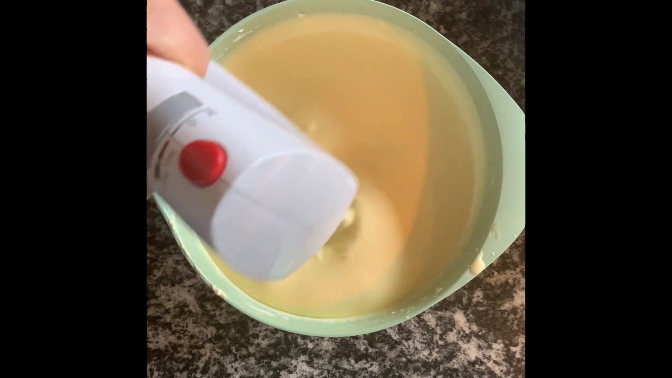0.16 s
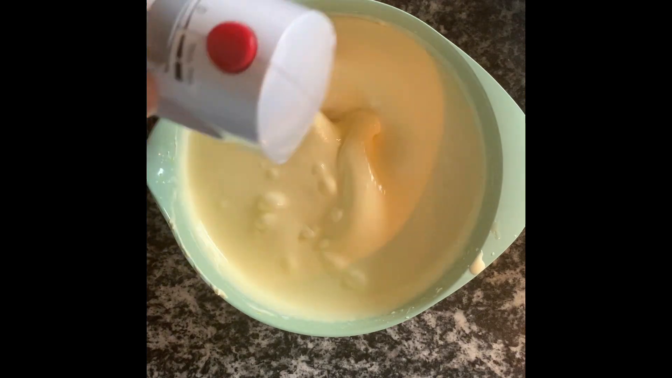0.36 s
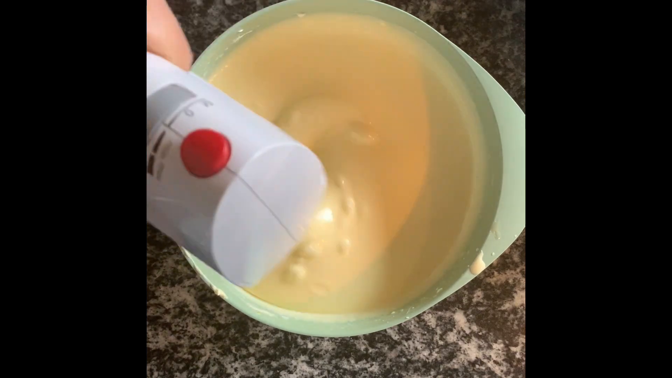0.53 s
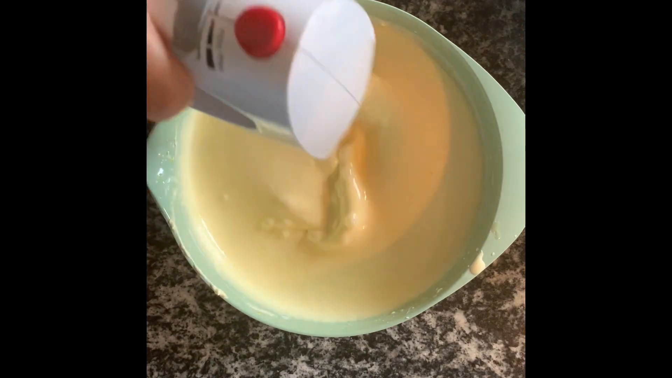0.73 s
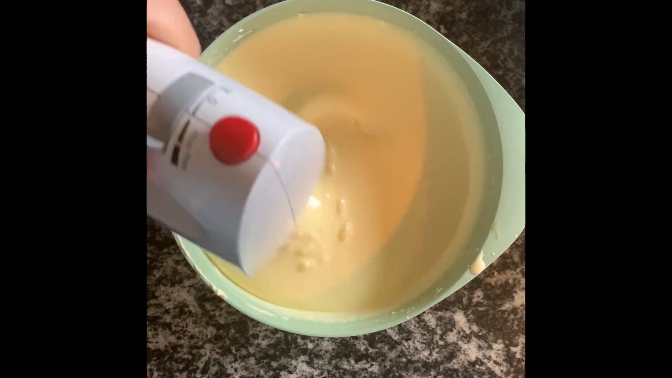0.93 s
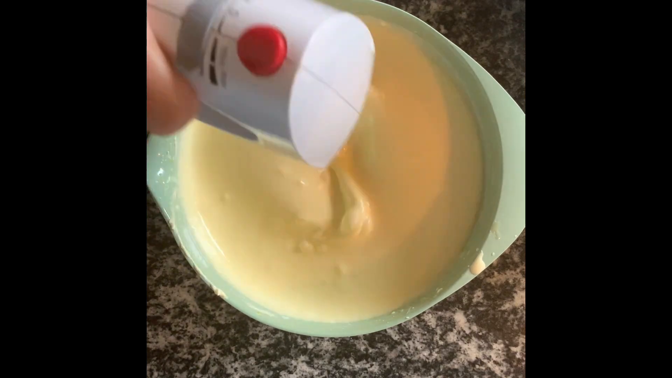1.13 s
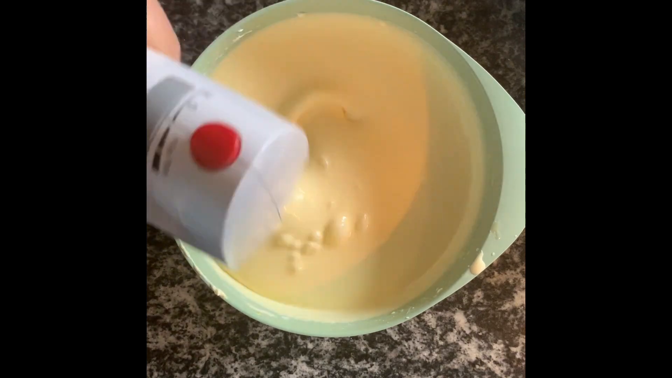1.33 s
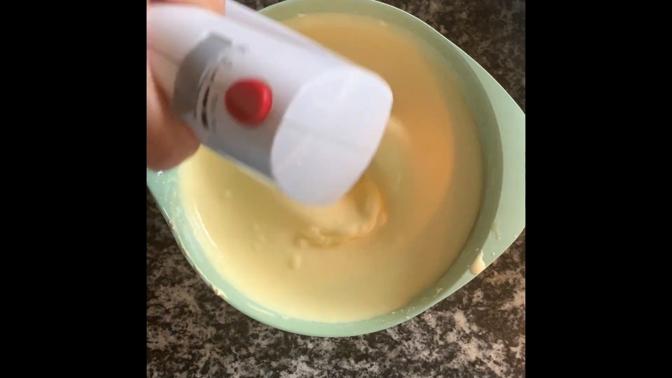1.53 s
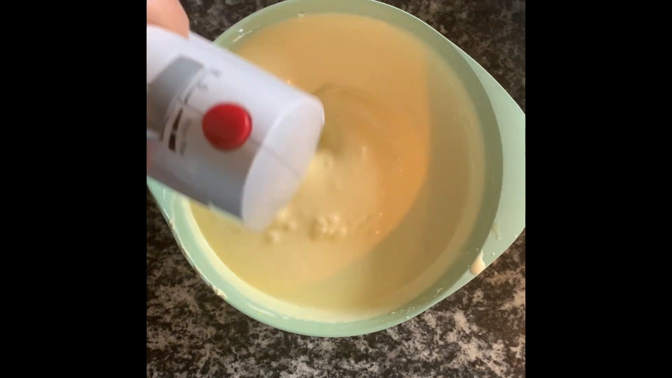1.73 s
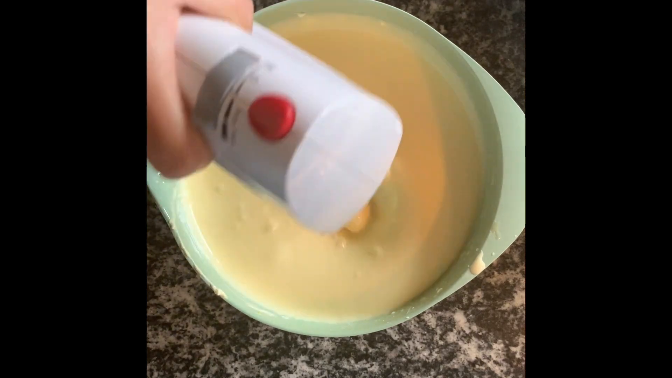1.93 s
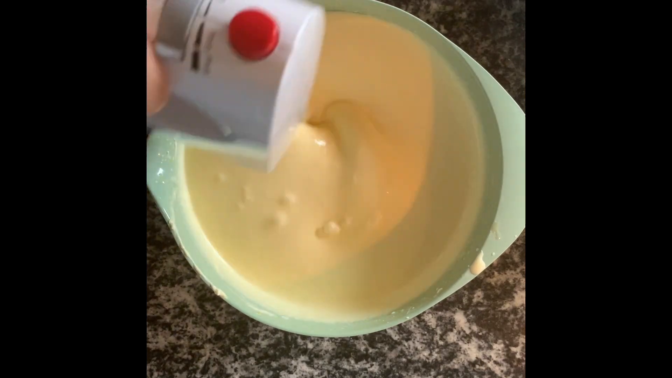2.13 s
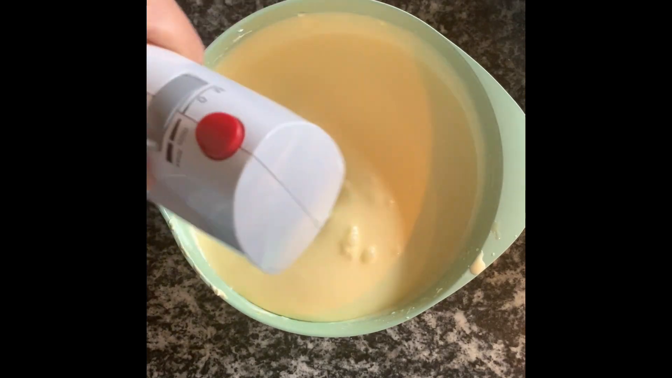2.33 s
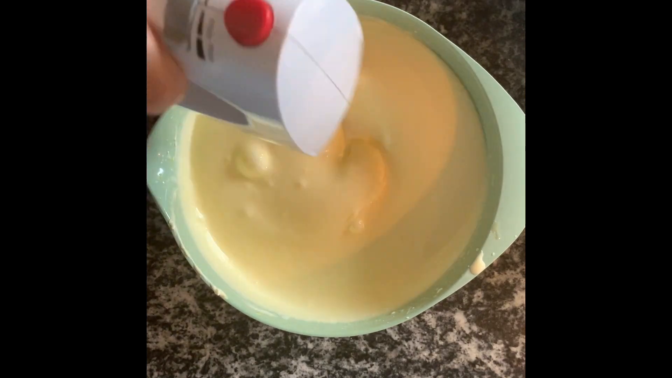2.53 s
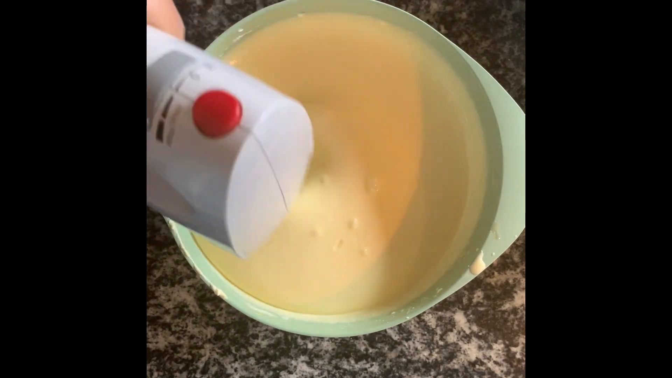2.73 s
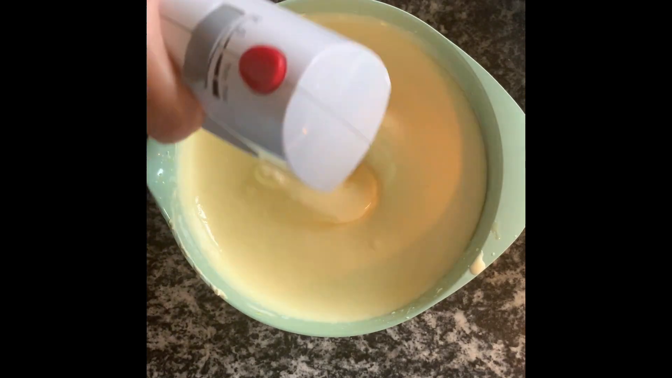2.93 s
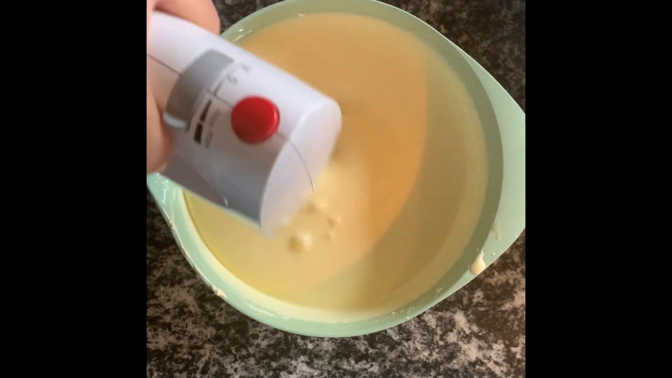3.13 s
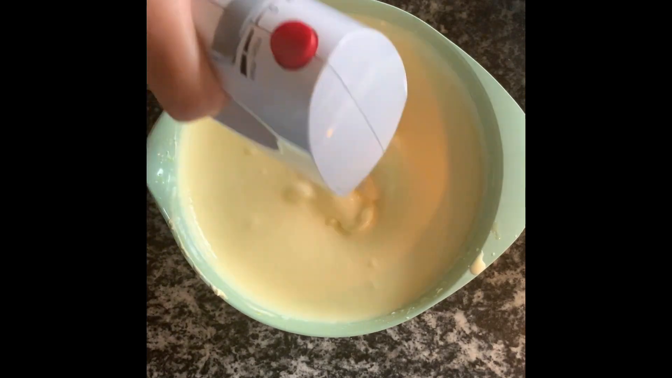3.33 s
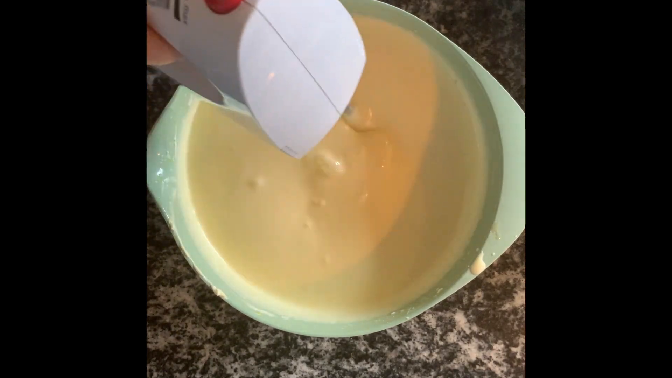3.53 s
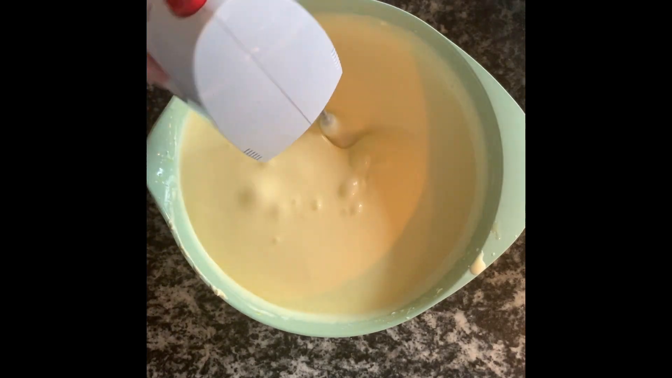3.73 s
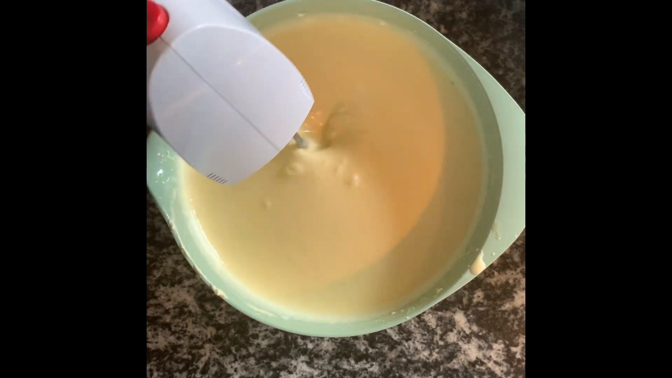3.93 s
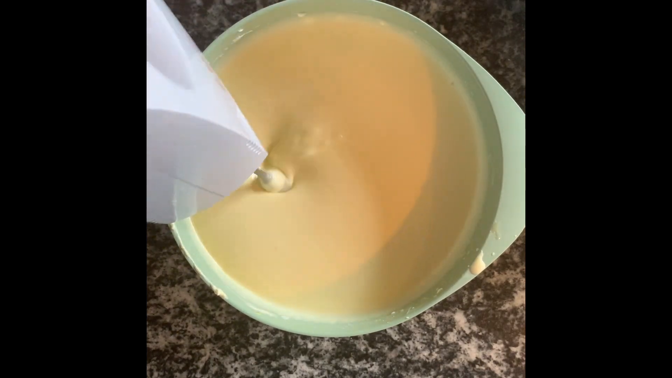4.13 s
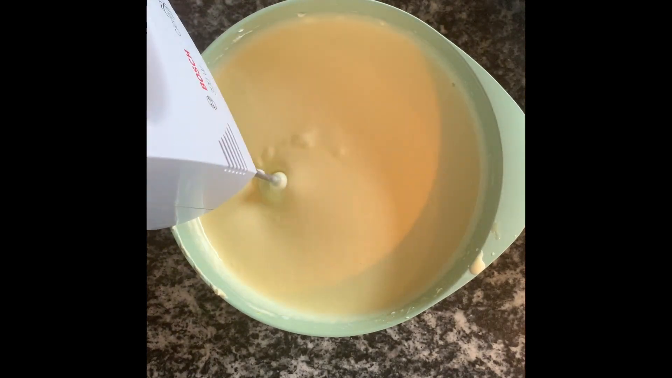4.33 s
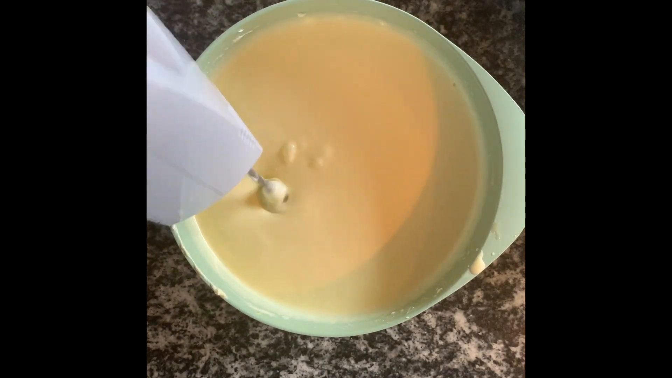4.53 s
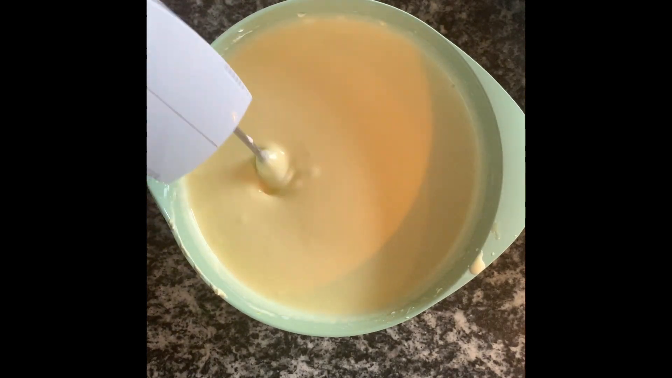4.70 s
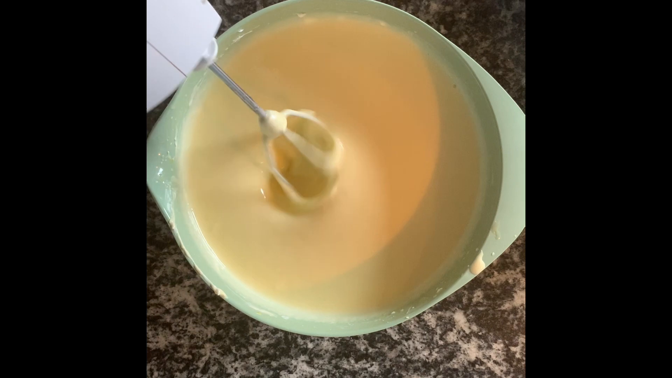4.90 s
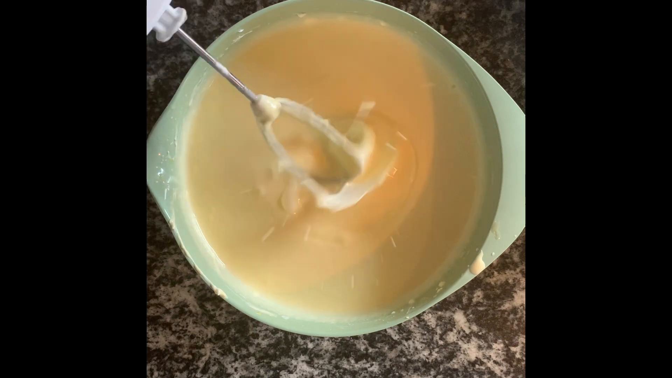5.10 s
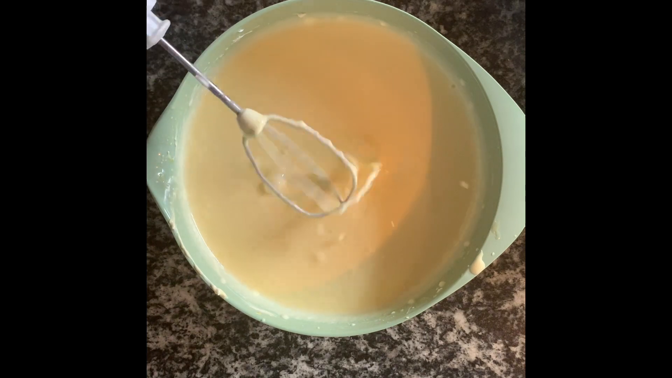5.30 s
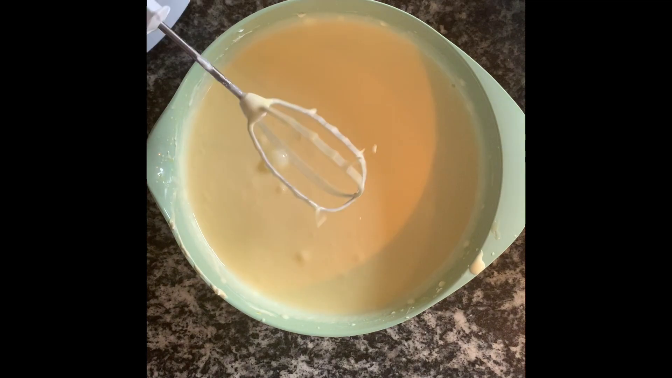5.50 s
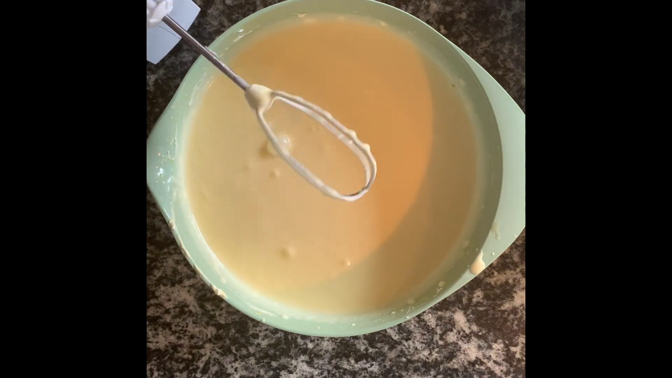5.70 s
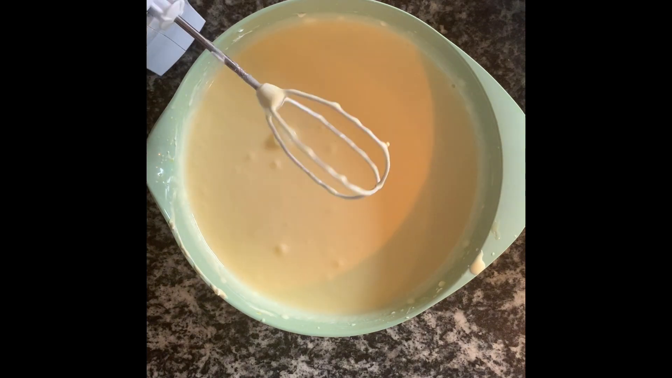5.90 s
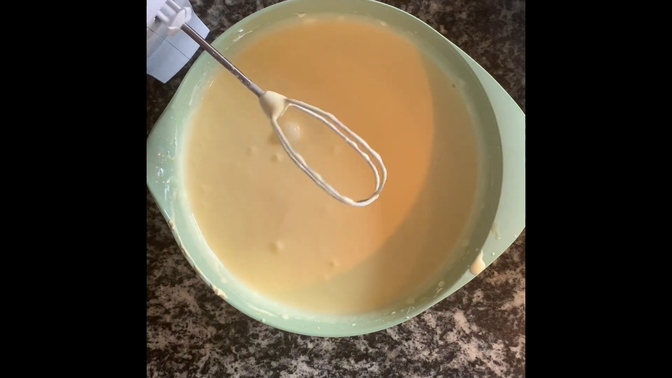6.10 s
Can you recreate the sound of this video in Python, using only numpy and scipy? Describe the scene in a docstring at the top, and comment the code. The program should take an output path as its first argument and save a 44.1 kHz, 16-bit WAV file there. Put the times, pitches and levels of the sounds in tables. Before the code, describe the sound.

Close up in a small hard-walled kitchen, an electric hand mixer hisses and whirrs steadily while its beater churns thick batter with a low burble. Wires rattle and knock in quick clusters against a plastic bowl. After about four seconds the power cuts, the whine slides down, wet slaps patter briefly, the loose shaft ticks slower and quieter, and a plastic clack ends it.

```python
"""An electric hand mixer whisks thick batter in a plastic bowl on a stone worktop.
At first the motor hisses and whines, the gears whirr, the beater churns, and its wires (bursts of noise
through the bowl's resonances) rattle and knock on each sweep along the wall. Then the power goes off,
the shaft runs down ticking, and the beater is lifted out still spinning, slapping the surface.
Last, the plastic housing clacks: noise bursts through its own resonances."""
import sys
import numpy as np
from scipy import signal
from scipy.fft import rfft, irfft, next_fast_len
from scipy.io import wavfile
from scipy.ndimage import uniform_filter1d

SR = 44100
rng = np.random.default_rng(int(sys.argv[2]) if len(sys.argv) > 2 else 0)


def generate_wav(sig):
    """Save sig (samples, or channels by samples) to the path in sys.argv[1] as 16-bit PCM at SR."""
    pcm = np.round(np.clip(np.atleast_2d(sig).T, -1, 1) * 32767).astype(np.int16)
    wavfile.write(sys.argv[1], SR, pcm)


N = 271213
T = np.arange(N) / SR
SIZE = next_fast_len(N + SR // 2)
HZ = np.maximum(np.arange(SIZE // 2 + 1) * SR / SIZE, 1)
CUTOFF_HZ = 16200


def from_db(db):
    """Decibels to gain."""
    return 10 ** (np.asarray(db) / 20)


def rms_one(x):
    """Scale to unit rms."""
    return x / np.sqrt(np.mean(x ** 2) + 1e-20)


def levelled(x):
    """Unit rms over every stretch of 3000 samples."""
    return x / np.sqrt(np.abs(uniform_filter1d(x ** 2, size=3000)) + 1e-12)


def noise():
    """White noise, unit rms."""
    return rng.standard_normal(N)


def over_time(points):
    """A curve in time, joined by straight lines."""
    s, value = np.transpose(points)
    return np.interp(T, s, value)


def over_hz(points):
    """A spectrum, joined by straight lines on a log-frequency axis."""
    hz, value = np.transpose(points)
    return np.interp(np.log(HZ), np.log(hz), value)


def drift(rate):
    """Slow chance with spread 1; rate in knots per s."""
    knots = rng.standard_normal(4000)
    return np.interp(T * rate, np.arange(len(knots)), knots) * np.sqrt(3 / 2)


def body(x, colour, resonances=()):
    """Minimum-phase filter of unit power gain: a broad colour with resonant peaks on it."""
    gain = from_db(over_hz(colour))
    for hz, width_hz, boost_db in resonances:
        peak = 1 / (1 + (2 * (HZ - hz) / width_hz) ** 2)
        gain = gain * np.sqrt(1 + (from_db(boost_db) ** 2 - 1) * peak)
    # folding the cepstrum makes the filter causal
    cepstrum = irfft(np.log(rms_one(gain) + 1e-9), SIZE)
    cepstrum[1:SIZE // 2] *= 2
    cepstrum[SIZE // 2 + 1:] = 0
    return irfft(rfft(x, SIZE) * np.exp(rfft(cepstrum)), SIZE)[:N]


def moving_ring(x, centre_hz, width_hz):
    """A narrow resonance whose centre moves: shift to 0 Hz, low-pass, shift back; levelled."""
    spin = np.exp(2j * np.pi * np.cumsum(centre_hz) / SR)
    narrow = signal.butter(2, width_hz, fs=SR, output="sos")
    return levelled(np.real(spin * signal.sosfilt(narrow, x / spin)))


def clicks(times, gains):
    """One impulse for each contact."""
    out = np.zeros(N)
    index = np.clip(np.round(np.asarray(times) * SR).astype(int), 0, N - 1)
    np.add.at(out, index, gains)
    return out


def bursts(times, gains, decay_s):
    """Each contact is a dense flurry of tiny slips that dies away."""
    starts = clicks(times, np.asarray(gains) ** 2) + 1e-18
    power = signal.lfilter([1], [1, -np.exp(-2 / (decay_s * SR))], starts)
    return np.sqrt(power) * noise()


# room re direct sound [f/Hz, level/dB]
KITCHEN_WET = [(150, -18), (500, -10), (2300, -8), (4500, -12), (16000, -12)]


def kitchen(x, t60_s=.16):
    """A short diffuse tail from hard walls, unrelated at the two ports."""
    t = T[:SR // 2]
    tail = rng.standard_normal((2, len(t))) * from_db(-60 * t / t60_s) * (t > .004)
    tail /= np.sqrt(np.sum(tail ** 2, axis=1, keepdims=True))
    return irfft(rfft(x, SIZE) * rfft(tail, SIZE) * from_db(over_hz(KITCHEN_WET)), SIZE)[:, :N]


# two microphone ports: left lead [f/Hz, phase/rad]
PORT_PHASE = [(0, 0), (200, -.1), (400, -.9), (700, -1.05), (830, .2), (980, -.6), (1150, .4), (1400, -.1),
              (2000, .5), (2350, 1.7), (3300, 1.3), (4000, 2.0), (4600, 3.1), (5100, 3.4), (6700, 6.28),
              (8950, 9.42), (11000, 12.57), (13200, 15.7), (15300, 18.85), (17000, 20)]
# left minus right [f/Hz, level/dB]
PORT_BALANCE = [(300, 0), (560, -3), (730, -10), (900, -1), (1080, -6), (1270, -1), (1600, -4),
                (1850, -1.5), (2270, -7), (2600, -2.5), (3300, 0)]


def ports(x):
    """The near sound reaches the two ports with a lag and a level that depend on frequency."""
    phase = np.interp(HZ, *np.transpose(PORT_PHASE))
    side = np.array([[.5], [-.5]])
    response = from_db(side * over_hz(PORT_BALANCE)) * np.exp(1j * side * phase)
    return irfft(rfft(x, SIZE) * response, SIZE)[:, :N]


# low thuds and lumps, also for the bowl [f/Hz, level/dB]
CHURN_COLOUR = [(25, -84), (50, -15.5), (75, 1.5), (120, -1), (165, 2), (260, -3.5), (500, -13),
                (2000, -74.5)]
# housing resonances [f/Hz, width/Hz, boost/dB]
HOUSING_MODES = [(148, 22, 26), (521, 42, 17), (656, 27, 18.4), (949, 50, 13.7), (1535, 150, 10.4),
                 (2120, 80, 6), (2680, 200, 5)]
# light dry ticks [t/s, level/dB]
TICKS = [(4.965, -22), (6.052, -43)]
# spectra [f/Hz, level/dB]
TICK_COLOUR = [(800, -20), (2500, 0), (4500, 0), (8500, 0), (12000, -5), (16000, -9)]
CLACK_COLOUR = [(40, -23), (120, -21), (300, -45), (620, -3), (1600, 6), (2600, 8.5), (4300, -7),
                (7500, 5.5), (16000, -18)]
SHUDDER_COLOUR = [(40, -8), (150, -10), (400, -4), (650, -4), (1000, -2), (2200, -13), (4300, -14),
                  (7500, -18), (16000, -37)]
# housing jolted in the hand [t/s, sharp clack level/dB, dull thump level/dB]
JOLTS = [(5.6, -66, -56), (6.089, -25.5, -27), (6.136, -46, -30)]


def handling(clack_s=.0085, thump_s=.012, shudder_db=-16, shudder_s=.3):
    """Ticks and jolts of the plastic housing; after a clack it shudders on."""
    tick_s, tick_db = np.transpose(TICKS)
    s, clack_db, thump_db = np.transpose(JOLTS)
    ticks = body(bursts(tick_s, from_db(tick_db), decay_s=.0009), TICK_COLOUR)
    clack = body(bursts(s, from_db(clack_db), clack_s), CLACK_COLOUR, HOUSING_MODES)
    shudder = body(bursts(s, from_db(clack_db + shudder_db), shudder_s), SHUDDER_COLOUR, HOUSING_MODES)
    thump = body(bursts(s + .0038, from_db(thump_db), thump_s), CHURN_COLOUR, HOUSING_MODES)
    return ticks + clack + shudder + thump


# ticking of the coasting shaft [t/s, level/dB]
COAST = [(4.0, -80), (4.6, -41), (5.0, -41), (5.45, -59), (5.75, -62), (6.08, -47)]
# its spectrum [f/Hz, level/dB]
COAST_COLOUR = [(150, -48), (450, -26), (1000, 14), (2200, 12), (4300, -14), (7000, -12), (16000, -14)]
# singing of the housing [t/s, level/dB]
SING = [(4.0, -72), (4.7, -55), (5.2, -56), (5.55, -54.5), (5.9, -60), (6.1, -65)]


def coasting(turns, scatter_db=3.0, level_db=-1):
    """With the load gone the loose shaft ticks once a turn and keeps the housing's middle modes singing."""
    s = T[np.flatnonzero(np.diff(np.floor(turns)))]
    ticks = bursts(s, from_db(scatter_db * rng.standard_normal(len(s))), decay_s=.0042)
    ticking = from_db(over_time(COAST) + level_db) * body(ticks, COAST_COLOUR, HOUSING_MODES)
    sing = np.zeros(N)
    for hz, width_hz, boost_db in HOUSING_MODES:
        if 400 < hz < 1100:
            mode = moving_ring(noise(), hz + 18 * drift(rate=12), width_hz / 2)
            sing += from_db(boost_db / 2 + 4 * drift(rate=14)) * mode
    return ticking + from_db(over_time(SING)) * rms_one(sing)


# shaft speed [t/s, speed/(turns per s)]
SPEED = [(0, 228), (.25, 227.3), (1.0, 228.2), (1.6, 228.0), (2.2, 227.2), (2.45, 223.5), (2.8, 228.2),
         (3.4, 227.8), (3.97, 229), (4.15, 220), (4.3, 198.5), (4.45, 172), (4.6, 146.5), (4.8, 120.5),
         (5.0, 98.5), (5.2, 80.8), (5.5, 56), (6.15, 15)]


def shaft():
    """Speed in turns per s, and the turns it has added up to."""
    speed = over_time(SPEED)
    return speed, np.cumsum(speed) / SR


def tones(turns, speed, orders, blur_rad, flicker_db=2):
    """Multiples of a rotation rate below the cutoff, each wavering in level and phase."""
    out = np.zeros(N)
    for multiple, db in orders:
        phase = 2 * np.pi * multiple * turns + blur_rad * drift(rate=54)
        gain = from_db(db + flicker_db * drift(rate=28)) * (multiple * speed < CUTOFF_HZ)
        out += np.sqrt(2) * np.sin(phase) * gain
    return out


# brush and fan hiss [t/s, level/dB]
HISS = [(0, -43), (3.8, -43.5), (4.25, -42), (4.55, -45), (4.76, -54), (5.08, -55.5), (5.3, -49),
        (5.6, -52), (6.08, -64)]
# its spectrum [f/Hz, level/dB]
HISS_COLOUR = [(40, 1), (110, -24), (330, -33), (420, -6), (520, 1.5), (660, -7), (790, -7), (980, 11.5),
               (1200, -5.5), (2200, 6), (4300, -26.5), (5300, 1.5), (8800, 2), (11000, -3.5), (16000, -8.5)]
# vent resonances in the hiss [f/Hz, width/Hz, boost/dB]
VENTS = [(9300, 73, 4.5)]
# steady hum while powered [f/Hz, level/dB]
HUM = [(118.5, -46.5), (227.5, -45)]
# armature buzz [multiple of shaft speed, level/dB]
BUZZ_ORDERS = [(3, -3), (4, -11), (9, -7), (10, 1), (12, -7)]
# commutator whine [multiple of bar rate, level/dB]
WHINE_ORDERS = [(1, 1), (2, 0), (3, -1), (3.5, -11), (4, 2), (5, 0), (6, -1), (7, -5)]
# vents let the whine out mostly in the treble [f/Hz, level/dB]
WHINE_COLOUR = [(3000, -22), (4500, -6), (5400, -1), (7000, 1), (8900, 2), (10200, 1), (11800, -5),
                (14500, -6), (16000, -17)]
# whine, which stands out as the motor runs down [t/s, level/dB]
WHINE = [(0, -62), (3.5, -62), (4.05, -59), (4.22, -49), (4.4, -53), (4.7, -61.5), (4.85, -65), (5.05, -63),
         (5.25, -63), (5.45, -68), (5.6, -73), (6.15, -88)]
POWER_OFF_S, COMMUTATOR_BARS = 4.02, 24
SHAFT_PLAY_TURNS, RUNOUT_DEPTH = .0031, .9   # blur and once-a-turn throb of the whine, power off
PRESS_HISS_DB = 5.5   # rise at pressure 1


def motor(turns, speed, pressure, level_db=7, spark_db=2.0, buzz_db=-46):
    """Brush and fan hiss, commutator whine, and the hum and buzz that stop with the current."""
    sparks = rms_one(noise() * from_db(spark_db * drift(rate=540)))
    hiss_db = over_time(HISS) + PRESS_HISS_DB * pressure + level_db
    hiss = from_db(hiss_db) * body(sparks, HISS_COLOUR, VENTS)

    powered = np.clip((POWER_OFF_S - T) * 10, 0, 1)
    hum = np.zeros(N)
    for hz, db in HUM:
        gain = np.sqrt(2) * from_db(db + 3 * drift(rate=7.2))
        hum += gain * np.sin(2 * np.pi * hz * T + .95 * drift(rate=12))
    buzz = from_db(buzz_db) * tones(turns, speed, BUZZ_ORDERS, blur_rad=.99)

    # unloaded, the shaft rattles in its play, which blurs the whine
    play = SHAFT_PLAY_TURNS * (1 - powered) * drift(rate=250)
    bars = tones(COMMUTATOR_BARS * (turns + play), COMMUTATOR_BARS * speed, WHINE_ORDERS,
                 blur_rad=.8, flicker_db=4)
    throb = 1 + RUNOUT_DEPTH * (1 - powered) * np.sin(2 * np.pi * turns)
    whine = body(bars * throb, WHINE_COLOUR) * from_db(over_time(WHINE))
    return hiss + powered * (hum + buzz) + whine


# gear whirr, falling away once the gears coast [t/s, level/dB]
WHIRR = [(0, -32), (3.3, -31.5), (4.02, -32.5), (4.2, -41), (4.95, -47.5), (5.5, -54.5), (6.1, -62)]
# its spectrum [f/Hz, level/dB]
WHIRR_COLOUR = [(100, -38), (500, -20), (1300, -8.5), (2100, -5.5), (3000, -14), (5000, -30.5),
                (16000, -27)]
# gearbox resonances [f/Hz, width/Hz, boost/dB]
GEARBOX_MODES = [(2300, 2600, 25), (2493, 115, 10), (3350, 70, 7.5)]
# gearbox sings out as the beater swings free of the wall [t/s, level/dB, pitch rise/Hz]
SURGES = [(.22, -39, 30), (.655, -30.5, 70), (1.07, -38, 50), (1.51, -31.5, 30), (1.78, -37, 0),
          (1.97, -33.5, 10), (2.47, -34, 25), (2.87, -34, 10), (3.28, -34.5, 30)]
SURGE_S, SURGE_SAG_HZ_PER_S = .05, 1200
GEAR_RING_HZ, GEAR_RING_WIDTH_HZ, GEAR_WAVER_HZ, GEAR_SWELL_DB = 2320, 65, 42, 2.5


def gears(turns, level_db=-2.5, mesh_db=3, ring_db=-6):
    """The worm drive scrapes once a shaft turn; one gearbox mode surges and sags between strokes."""
    whirr_db = over_time(WHIRR)
    mesh = from_db(mesh_db * np.sin(2 * np.pi * turns))
    scrape = body(rms_one(noise() * mesh), WHIRR_COLOUR, GEARBOX_MODES)
    ring_gain = from_db(whirr_db + ring_db)
    centre_hz = GEAR_RING_HZ + GEAR_WAVER_HZ * drift(rate=30)
    for s, db, rise_hz in SURGES:
        swell = np.exp(-((T - s) / SURGE_S) ** 2)
        ring_gain = ring_gain + from_db(db) * swell
        centre_hz = centre_hz + swell * (rise_hz - SURGE_SAG_HZ_PER_S * (T - s))
    ring = moving_ring(noise() * mesh, centre_hz, GEAR_RING_WIDTH_HZ)
    ring = ring * from_db(GEAR_SWELL_DB * drift(rate=16))
    return from_db(whirr_db + level_db) * scrape + ring_gain * ring


# unequal reach of the four beater wires [level/dB]
WIRE_DB = [-6.5, -8, -12, -5.5]
GEAR_RATIO, FIRST_WIRE_TURNS = 12.3, .11


def wire_passes(turns, scatter_db, jitter_s):
    """Times and strengths at which the four wires sweep past the bowl."""
    count = len(WIRE_DB)
    wire = np.floor((turns / GEAR_RATIO - FIRST_WIRE_TURNS) * count).astype(int)
    at = np.flatnonzero(np.diff(wire)) + 1
    chance = rng.standard_normal((len(at), 2))
    strength = from_db(np.array(WIRE_DB)[wire[at] % count] + scatter_db * chance[:, 1])
    return T[at] + jitter_s * chance[:, 0], strength


# wires slapping the batter near the surface [t/s, level/dB]
SLAP = [(3.3, -57), (3.9, -40), (4.2, -28), (4.45, -32), (4.7, -45.5), (5.2, -61), (6.1, -80)]
# its spectrum [f/Hz, level/dB]
SLAP_COLOUR = [(40, -46), (100, -7), (190, -19), (380, -0.5), (600, -3), (1100, -3), (1600, 4.5),
               (2400, -12), (3300, -3), (4400, -29.5)]
# its resonances [f/Hz, width/Hz, boost/dB]
SLAP_RINGS = [(439, 17, 13.5), (585, 35, 18.5), (1056, 33, 12.5)]


def slaps(passes):
    """As the beater comes up, each wire slaps the surface: a hollow, wet patter."""
    patter = body(bursts(*passes, decay_s=.02), SLAP_COLOUR, SLAP_RINGS)
    return from_db(over_time(SLAP)) * levelled(patter)


# batter thrown about, until the beater is lifted clear; also drives the rattle [t/s, level/dB]
BATTER = [(0, 2), (2.0, 0.5), (3.2, -2.5), (3.8, -3), (4.1, 3), (4.399, 5), (4.63, -1), (4.76, -15.5),
          (5.25, -32), (6.1, -50)]
# hollow around the beater, higher as a stroke squeezes it against the wall [t/s, f/Hz]
HOLLOW = [(.07, 115), (.15, 163), (0.221, 108), (.33, 137.5), (.42, 163), (.49, 109.9), (.57, 160),
          (.69, 113), (.85, 150), (.97, 156), (1.07, 103.6), (1.34, 157), (1.47, 98.5), (1.57, 126.1),
          (1.63, 157), (1.76, 112.9), (1.99, 118), (2.1, 152.7), (2.25, 165.3), (2.35, 102), (2.53, 127.4),
          (2.69, 164.2), (2.8, 106.3), (3.3, 112.6), (3.5, 160), (3.85, 128), (4.2, 154), (4.34, 119),
          (4.5, 101.5), (4.62, 92), (4.8, 79.3)]
CHURN_DB, PRESS_CHURN_DB, PRESS_BOOM_DB = -38.5, 6, 3   # clear of the wall; rises at pressure 1
HOLLOW_WOBBLE_HZ, HOLLOW_WIDTH_HZ = 6, 7


def churn(passes, pressure, level_db=-2.0, boom_db=-3):
    """Each wire shoves the thick batter: a low, lumpy burble that rings the hollow around the beater."""
    shoves = bursts(*passes, decay_s=.0084)
    lumps = levelled(body(shoves, CHURN_COLOUR))
    hollow_hz = over_time(HOLLOW) + HOLLOW_WOBBLE_HZ * drift(rate=40)
    boom = moving_ring(shoves, hollow_hz, HOLLOW_WIDTH_HZ)
    burble = from_db(level_db) * lumps + from_db(boom_db + PRESS_BOOM_DB * pressure) * boom
    return from_db(CHURN_DB + over_time(BATTER) + PRESS_CHURN_DB * pressure) * burble


# bowl resonances [f/Hz, width/Hz, boost/dB]
BOWL_MODES = [(151, 23, 16), (282.3, 18, 9), (430, 34, 11.5), (603, 64, 16), (707.4, 91, 13.5),
              (876, 21, 11), (1010, 49, 6), (1285, 115, 3), (1874, 56, 3), (2110, 280, 1), (3326, 42, 7)]
# spectra of wire on bowl [f/Hz, level/dB]
KNOCK_COLOUR = [(40, -27), (90, -29.5), (300, -4), (520, -9), (800, -7), (1300, 6), (2100, 4.5),
                (3000, 1.5), (4200, -8.5), (8300, -4), (16000, -49)]
CRACK_COLOUR = [(1000, -72), (4200, 2.5), (5400, 2), (8000, 9), (11000, -2.5), (13000, 4), (16000, -18)]
RATTLE_DB, PRESS_RATTLE_DB = -36, 9   # clear of the wall; rise at pressure 1
RATTLE_FOLLOWS = .53   # share of the batter's level swing, dB per dB


def rattle(passes, pressure, smear_db=-12, level_db=1, crack_db=-14, low_cut_hz=200, rough_db=3):
    """Wires graze the bowl and slap the batter on every pass, lightly, ringing the bowl's resonances."""
    grazes = bursts(*passes, decay_s=.004) + from_db(smear_db) * noise()
    grazes = rms_one(grazes * from_db(rough_db * drift(rate=600)))
    rattle_db = RATTLE_DB + RATTLE_FOLLOWS * over_time(BATTER) + PRESS_RATTLE_DB * pressure
    low_cut = signal.butter(2, low_cut_hz, "high", fs=SR, output="sos")
    grazes = signal.sosfilt(low_cut, grazes * from_db(rattle_db + level_db))
    return body(grazes, KNOCK_COLOUR, BOWL_MODES) + from_db(crack_db) * body(grazes, CRACK_COLOUR)


# beater swept along the wall [start t/s, end t/s, pressure (1 = firm), brightness level/dB]
SWEEPS = [(0.115, 0.149, 0.59, -3), (0.292, 0.44, 0.57, -16), (0.503, 0.556, 0.79, -12),
          (0.721, 0.835, 0.48, 7), (0.859, 0.97, 0.73, -13), (1.144, 1.28, 0.56, 2),
          (1.303, 1.394, 0.97, -16), (1.557, 1.63, 0.53, -7.5), (2.02, 2.299, 0.98, -12),
          (2.518, 2.745, 0.88, -21), (2.982, 3.035, 0.65, -25), (3.423, 3.754, 0.35, -22),
          (3.853, 4.067, 0.34, -22), (4.113, 4.454, 0.3, -17)]
PRESS_S, RELEASE_S = .013, .05   # build-up before a sweep, let-go after it


def wall_contact():
    """Pressure of the beater on the wall (attack, hold, release) and brightness of the touch."""
    pressure, bright_points = np.zeros(N), []
    for start, end, firmness, bright_db in SWEEPS:
        corners = [start - PRESS_S, start, end, end + RELEASE_S]
        pressure += firmness * np.interp(T, corners, [0, 1, 1, 0])
        bright_points += [(start, bright_db), (end, bright_db)]
    return np.clip(pressure, 0, 1.2), over_time(bright_points)


# single knocks of a wire on the bowl, strong and faint [t/s, knock level/dB, crack level/dB]
KNOCKS = [(0.115, -17.5, -20.5), (0.13, -19, -21), (0.147, -25, -20), (0.158, -19.5, -21),
          (0.318, -18.5, -26), (0.329, -15, -38), (0.347, -19.5, -26), (0.401, -16.5, -28),
          (0.443, -17, -29), (0.46, -23, -37), (0.509, -19, -22.5), (0.537, -17.5, -33),
          (0.548, -14.5, -13), (0.562, -17.5, -30), (0.721, -16, -27), (0.752, -20.5, -25),
          (0.762, -14.5, -19.5), (0.777, -12.5, -19.5), (0.794, -20.5, -24), (0.819, -16.5, -24),
          (0.836, -28, -27), (0.86, -28, -26), (0.874, -14, -21), (0.889, -18, -29), (0.914, -17.5, -26),
          (0.926, -13.5, -20.5), (0.939, -16.5, -22), (0.966, -17.5, -31), (0.979, -16, -18),
          (1.151, -20.5, -30), (1.195, -14.5, -28), (1.206, -19, -21), (1.238, -23, -27), (1.25, -18, -30),
          (1.263, -14.5, -23), (1.291, -21, -37), (1.304, -16.5, -27), (1.315, -15.5, -17),
          (1.342, -22.5, -28), (1.355, -16.5, -21.5), (1.369, -21, -25), (1.385, -19, -41),
          (1.581, -18.5, -44), (1.624, -15.5, -36), (1.638, -15, -27), (2.041, -15, -31), (2.055, -20, -32),
          (2.072, -21.5, -25), (2.1, -18.5, -36), (2.114, -15, -21.5), (2.128, -15, -25),
          (2.168, -13.5, -20), (2.182, -16.5, -20.5), (2.222, -14, -24.5), (2.235, -15.5, -20),
          (2.264, -22, -24), (2.277, -15, -20), (2.291, -19, -26), (2.534, -14.5, -35), (2.547, -15, -38),
          (2.565, -19.5, -32), (2.591, -16.5, -31), (2.606, -16, -19.5), (2.619, -17.5, -26),
          (2.66, -15.5, -21.5), (2.674, -16.5, -27), (2.703, -20.5, -33), (2.715, -18, -27),
          (2.729, -16, -23), (2.998, -21, -30), (3.488, -22.5, -46), (3.889, -22, -28), (4.053, -26.5, -28),
          (4.174, -17.5, -37), (4.209, -19.5, -28), (4.289, -20.5, -41), (4.345, -28, -41),
          (4.356, -29, -29), (4.376, -20.5, -39), (4.417, -22, -33), (4.569, -19, -48)]
TAP_DB, TAP_RANGE_DB = -17, 14   # tap at pressure 1; how much softer at the lightest touch


def wall_blows(passes, pressure, bright_db, scatter_db=5.0, bright_scatter_db=3):
    """Under pressure each passing wire taps the wall, unless near a listed knock: t/s, knock dB, crack dB."""
    s, strength = passes
    press = np.interp(s, T, pressure)
    chance = rng.standard_normal((len(s), 2))
    level_db = TAP_DB - TAP_RANGE_DB * (1 - press) + 20 * np.log10(strength)
    level_db = level_db + scatter_db * chance[:, 0]
    crack_db = level_db + np.interp(s, T, bright_db) + bright_scatter_db * chance[:, 1]
    taps = np.transpose([s, level_db, crack_db])
    gap_s = np.abs(s[:, None] - np.array(KNOCKS)[:, 0]).min(axis=1)
    return np.vstack([taps[(press > 0) & (gap_s > .009)], KNOCKS])


SPOT_DETUNE, SPOT_SPREAD_DB = .035, 2.5   # spread of mode pitch (fraction) and boost between spots


def struck_bowl(blows, strike_db=15.0, blow_db=0.0, rebound_db=-4.0, ring_db=-15):
    """Blows on one spot of the wall: the wire strikes and rebounds; the bowl rings in that spot's colour."""
    s, level_db, _ = np.transpose(blows)
    strike = clicks(s, from_db(level_db + strike_db))
    blow = bursts(s, from_db(level_db + blow_db), decay_s=.0053)
    rebound = bursts(s + .0025, from_db(level_db + rebound_db), decay_s=.005)
    ring = bursts(s, from_db(level_db + ring_db), decay_s=.033)
    modes = []
    for hz, width_hz, boost_db in BOWL_MODES:
        spot_hz = hz * (1 + SPOT_DETUNE * rng.standard_normal())
        modes.append((spot_hz, width_hz, boost_db + SPOT_SPREAD_DB * rng.standard_normal()))
    return body(strike + blow + rebound + ring, KNOCK_COLOUR, modes)


def knocks(blows, snap_db=4.0, thud_db=-9, spots=5):
    """The blows fall on several spots in turn; each also cracks and thuds on the worktop."""
    s, level_db, crack_db = np.transpose(blows)
    crack = bursts(s, from_db(crack_db + snap_db), decay_s=.0032)
    thud = bursts(s, from_db(level_db + thud_db), decay_s=.0026)
    struck = sum(struck_bowl(blows[spot::spots]) for spot in range(spots))
    return struck + body(crack, CRACK_COLOUR) + body(thud, CHURN_COLOUR, BOWL_MODES)


def scene():
    """One shaft times motor, gears and wires; wall pressure raises knocks, rattle, churn and hiss."""
    speed, turns = shaft()
    pressure, bright_db = wall_contact()
    passes = wire_passes(turns, scatter_db=0.0, jitter_s=.0007)
    mixer = handling() + coasting(turns) + motor(turns, speed, pressure) + gears(turns)
    bowl = slaps(passes) + churn(passes, pressure) + rattle(passes, pressure)
    bowl = bowl + knocks(wall_blows(passes, pressure, bright_db))
    return ports(bowl + mixer) + kitchen(bowl + mixer)


def record(dry):
    """The microphone sheds the deepest bass, rounds the sharpest peaks and cuts the top steeply."""
    bass_cut = signal.butter(4, 48, "high", fs=SR, output="sos")
    rounded = np.tanh(signal.sosfilt(bass_cut, dry))
    top_cut = signal.ellip(10, .2, 80, CUTOFF_HZ, fs=SR, output="sos")
    return signal.sosfilt(top_cut, rounded)


dry = scene()
out = record(dry)
generate_wav(out)
```